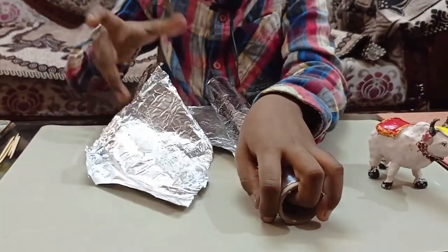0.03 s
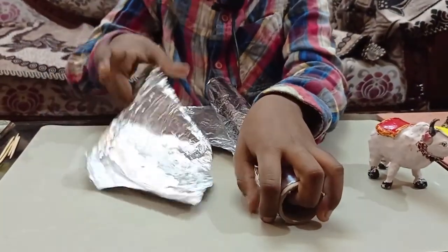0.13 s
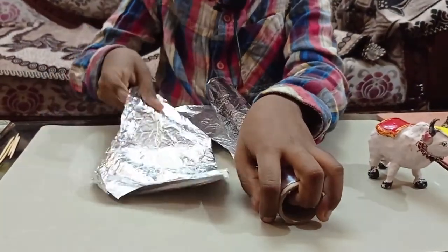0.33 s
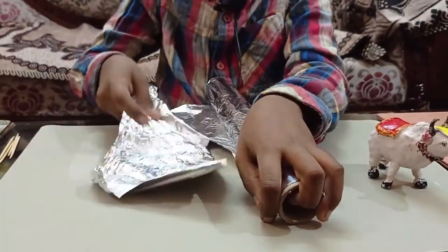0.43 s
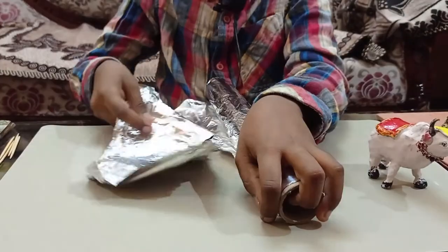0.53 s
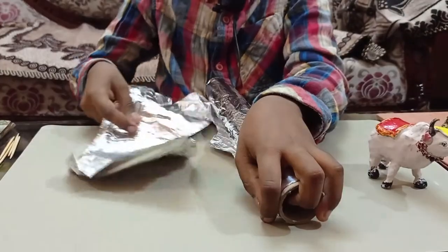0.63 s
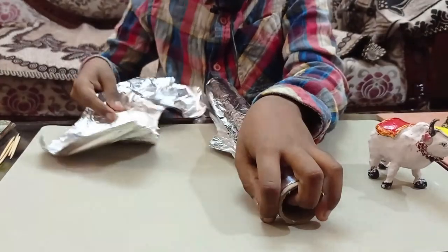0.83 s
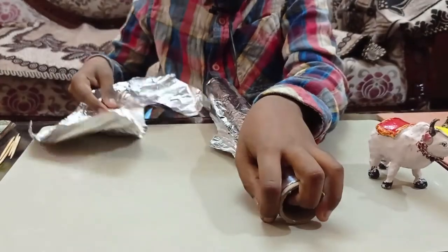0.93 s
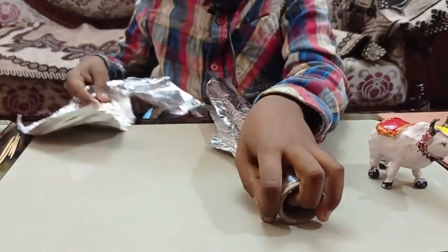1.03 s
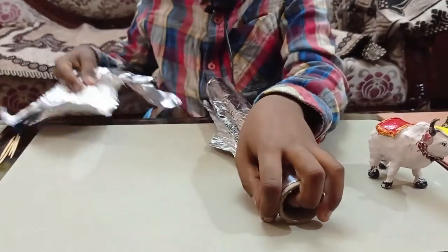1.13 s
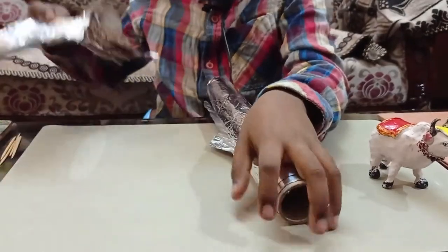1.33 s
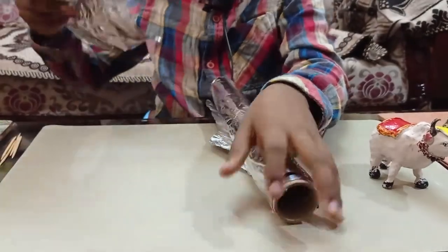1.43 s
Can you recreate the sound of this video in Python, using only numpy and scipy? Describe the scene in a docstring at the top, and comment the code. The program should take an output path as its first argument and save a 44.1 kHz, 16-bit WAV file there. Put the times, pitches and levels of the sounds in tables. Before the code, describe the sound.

Aluminium foil crinkles and crackles as a hand crumples and drags it across a table

```python
"""A hand crumples a sheet of aluminium foil and drags it over a table in a small, furnished room.
First come faint crackles and dull bumps: short, low, quickly damped rings on the table top.
From 0.2 s thousands of tiny creases buckle, each ringing its facets briefly, and larger creases snap.
From about 0.45 to 1.25 s the foil also slides, heard as coloured noise with a rough ring near 0.75 s.
Then the crinkling thins out to a few weak snaps; echoes and a very faint hiss run all the way through."""
import sys
import numpy as np
from scipy import signal
from scipy.fft import rfft, irfft
from scipy.io import wavfile

SR = 44100
rng = np.random.default_rng(int(sys.argv[2]) if len(sys.argv) > 2 else 0)


def store_pcm(level_fs):
    """Save levels as 16-bit WAV."""
    pcm = np.round(np.clip(level_fs, -1, 1) * 32767).astype(np.int16)
    wavfile.write(sys.argv[1], SR, np.atleast_2d(pcm).T)


N = 66150  # length of the scene in samples (1.5 s)
FACET_ATTACK_S = 0.000067  # how quickly a piece of foil starts to sound


def undb(db):
    """Turn decibels into a plain gain."""
    return 10 ** (np.asarray(db) / 20)


def unit(x):
    """Scale a sound so that its average (rms) level is 1."""
    return x / np.sqrt(np.mean(x ** 2))


def band(x, hz, kind="bandpass", order=3):
    """Keep only some of the frequencies (Butterworth filter)."""
    edges = np.clip(hz, 10, .45 * SR)
    return signal.sosfilt(signal.butter(order, edges, kind, fs=SR, output="sos"), x)


def colour(x, points):
    """Shape the tone to follow (frequency [Hz], level [dB]) points, without any sound before its cause."""
    hz, db = np.array(points).T
    size = 2048
    f = np.maximum(np.fft.rfftfreq(size, 1 / SR), 1)
    gain = undb(np.interp(np.log(f), np.log(hz), db))
    # folding the cepstrum forward in time gives a minimum-phase filter
    cepstrum = irfft(np.log(gain))
    cepstrum[1:size // 2] *= 2
    cepstrum[size // 2 + 1:] = 0
    impulse = irfft(np.exp(rfft(cepstrum)))
    return signal.fftconvolve(x, impulse)[:N]


def add(out, s, sound):
    """Mix a sound in at time s."""
    i = int(np.clip(s * SR, 0, N - 1))
    out[i:i + len(sound)] += sound[:N - i]


def ring(t, hz, decay_s):
    """A vibration that dies away, like a tapped plate."""
    return np.sin(2 * np.pi * hz * t) * np.exp(-t / decay_s)


def hiss():
    """Very faint steady noise, softer above 2 kHz."""
    return undb(-101) * unit(band(rng.standard_normal(N), 2000, "lowpass", order=1))


# Tone of the echoes off walls and furniture, only the shape counts: (frequency [Hz], level [dB])
ROOM_TONE = [(60, -8.5), (200, -2), (1300, -0.5), (1750, 1), (2300, 0.5), (3250, -5.5), (4500, 3),
             (5300, -34), (6300, -6), (10500, -6), (15000, -5)]
ROOM_DB, ROOM_T60_S, ROOM_GAP_S = -10.5, 0.23, 0.0035  # T60: time for the echoes to fall by 60 dB


def room(x):
    """Short, soft reflections from walls and furniture, as a fading burst of noise-like echoes."""
    t = np.arange(N) / SR
    fade = np.exp(-np.log(1000) * t / ROOM_T60_S) * (t > ROOM_GAP_S)
    tail = colour(rng.standard_normal(N), ROOM_TONE) * fade
    echoes = tail / np.sqrt(2 * np.sum(tail ** 2))  # the 2 takes a further 3 dB off ROOM_DB
    return undb(ROOM_DB) * signal.fftconvolve(x, echoes)[:N]


# Loudness of the crinkling in four bands, from low to high:
# (time [s], low-mid level [dB], mid level [dB], treble level [dB], top level [dB])
CRINKLE_LEVELS = [(0, -55, -51, -73, -88), (0.018, -69.5, -66.5, -88, -84), (0.07, -80, -69.5, -82, -103),
                  (0.13, -96, -117, -108, -107), (0.178, -100, -102, -110, -109),
                  (0.209, -66, -58.5, -73, -77), (0.23, -47, -47.5, -66, -71), (0.27, -51, -56.5, -62, -70),
                  (0.335, -53.5, -47.5, -65, -58), (0.36, -44.5, -46.5, -59, -68),
                  (0.406, -56.5, -56.5, -68, -65), (0.469, -53.5, -47, -77, -63),
                  (0.488, -48, -44.5, -60.5, -61.5), (0.563, -45, -44, -58.5, -57),
                  (0.598, -36.5, -36, -57, -56), (0.625, -38.5, -32.5, -46.5, -52),
                  (0.7, -39, -34, -54.5, -52), (0.77, -41, -36.5, -51, -59.5), (0.88, -46, -38, -48, -58),
                  (0.967, -47, -40.5, -53, -63), (0.978, -40.5, -36.5, -50, -57.5),
                  (1.069, -48.5, -37.5, -48, -59), (1.095, -55, -47, -62, -65),
                  (1.132, -45, -32.5, -46, -56), (1.167, -69, -70.5, -64, -79),
                  (1.203, -49.5, -41.5, -47, -65), (1.25, -63, -57.5, -64, -89),
                  (1.32, -84.5, -66, -84, -91), (1.39, -77, -63.5, -92, -79), (1.429, -75.5, -64, -80, -80),
                  (1.47, -74, -59, -60, -75), (1.5, -84, -68, -76, -70)]


def level_curve(column):
    """One column of the crinkle level in dB, at every sample."""
    rows = np.array(CRINKLE_LEVELS)
    return np.interp(np.arange(N) / SR, rows[:, 0], rows[:, column])


# Soft bumps of sheet and hand: (time [s], level before BUMP_DB is added [dB], ring frequency [Hz])
SOFT_BUMPS = [(.004, -60, 200), (.035, -71, 70), (.085, -59.5, 68), (0.198, -56, 89.5), (0.227, -42, 162),
              (0.247, -51, 110), (0.262, -47, 116), (.329, -42, 123), (0.395, -45.5, 177), (.426, -35, 216),
              (.489, -40.5, 159), (0.553, -46, 160), (0.577, -53, 110), (0.587, -43, 150), (0.699, -46, 80),
              (0.731, -52, 72.4), (0.761, -53, 109), (0.814, -47, 134), (0.975, -40, 207),
              (1.009, -65, 218), (1.111, -51, 103), (1.12, -44, 138), (1.204, -45, 207), (1.249, -55, 68),
              (1.329, -60.5, 74.5)]
BUMP_DB, BUMP_CYCLES, BUMP_ATTACK_S = 4, 0.72, 0.0014
# flutter: level at the loudest mid-band crinkle, its band, and dB of change per dB of crinkle
FLEX_DB, FLEX_HZ, FLEX_FOLLOW = -57.5, (63, 237), 0.66


def handling():
    """Dull bumps, damped within about a cycle, and the low flutter of the flexing sheet."""
    bumps, t = np.zeros(N), np.arange(SR // 10) / SR
    attack = 1 - np.exp(-t / BUMP_ATTACK_S)
    for s, db, hz in SOFT_BUMPS:
        add(bumps, s, undb(db + BUMP_DB) * ring(t, hz, BUMP_CYCLES / hz) * attack)
    effort_db = level_curve(2)
    flex_db = FLEX_DB + FLEX_FOLLOW * (effort_db - effort_db.max())
    flutter = unit(band(rng.standard_normal(N), FLEX_HZ)) * undb(flex_db)
    return bumps + flutter


SCRAPE_DB, SCRAPE_S, SCRAPE_LENGTH_S = -46, .75, 0.057  # loudest at SCRAPE_S, in a bell-shaped swell
SCRAPE_HZ, SCRAPE_RISE_HZ_PER_S, SCRAPE_WIDTH_HZ = 824, 1440, 54  # pitch at SCRAPE_S, rise, roughness


def scrape():
    """A brief ring as the sheet slides: a rising tone made rough by slow random wobble."""
    t = np.arange(N) / SR - SCRAPE_S
    phase = 2 * np.pi * (SCRAPE_HZ * t + SCRAPE_RISE_HZ_PER_S * t ** 2 / 2)
    grip = band(rng.standard_normal((2, N)), SCRAPE_WIDTH_HZ, "lowpass", order=2)
    rough_tone = unit(grip[0] * np.sin(phase) + grip[1] * np.cos(phase))
    swell = np.exp(-.5 * (t / SCRAPE_LENGTH_S) ** 2)
    return undb(SCRAPE_DB) * rough_tone * swell


# Tone of the sliding friction, only the shape counts: (frequency [Hz], level [dB])
SLIDE_TONE = [(200, -22), (800, -12), (1600, -9.5), (3200, -0.5), (4800, -9), (6900, -18), (8100, -25),
              (10300, -31), (13500, -44), (15200, -31), (16000, -37)]
SLIDE_S, SLIDE_RAMP_S, SLIDE_DB = (0.556, 1.157), 0.25, 1  # mid-ramp times; level beside the creases


def sliding():
    """Fine friction of the foil on the table, too dense to hear as single grains."""
    t = np.arange(N) / SR
    inside_s = np.minimum(t - SLIDE_S[0], SLIDE_S[1] - t)
    contact = np.clip(inside_s / SLIDE_RAMP_S + .5, 0, 1)
    rustle = unit(colour(rng.standard_normal(N), SLIDE_TONE))
    return undb(SLIDE_DB) * contact * rustle, contact


# Larger creases that snap:
# (time [s], facet peak level [dB], ring frequency [Hz], crack level beside it before CRACK_DB is added [dB])
BIG_SNAPS = [(0.0437, -50.5, 6410, 4.5), (0.141, -88, 3450, -8), (0.204, -55, 3600, -14),
             (0.2114, -50, 3650, -20), (0.22, -34, 3300, -15), (0.2244, -31, 3160, -17.5),
             (0.277, -33.5, 3530, -8), (0.292, -31.5, 1080, -27), (0.3059, -24.5, 3130, -11),
             (0.3097, -22.5, 2700, -17), (0.3123, -33, 1400, -20), (0.3239, -30, 2080, -24),
             (0.354, -31, 3320, -17), (0.3649, -25.5, 1016, -39), (0.3754, -27, 3130, -11),
             (0.414, -39, 1230, -20), (0.4325, -25, 3370, -23), (0.4354, -30, 1250, -11),
             (.457, -35.5, 1060, -11), (.482, -33, 3640, -15), (.494, -39, 3550, -6), (.534, -31, 1140, -9),
             (0.5427, -27, 3800, -9.5), (.552, -24, 2700, -17), (0.6174, -23, 1060, -12),
             (.626, -19, 3160, -17), (0.6487, -25.5, 2920, -11), (0.7115, -24, 2870, -16),
             (.806, -21, 3600, -20), (0.957, -30, 3770, -27), (.978, -26, 3360, -15.5),
             (1.063, -26, 1010, -18), (1.2025, -27, 2060, -22), (1.2198, -29.5, 3850, -39),
             (1.271, -36, 3520, -46), (1.3426, -44, 3540, -20), (1.3632, -44, 3970, -33),
             (1.3861, -52, 3500, -16), (1.3965, -44.5, 3700, -31), (1.4573, -36.5, 3820, -9)]
CRACK_DB, CRACK_S, CRACK_HZ = -12, 0.0053, (5660, 10900)  # level, decay and band of the bright crack
SNAP_RING_S, SPLINTER_DB, SPLINTER_S = 0.00062, -14.5, 0.0047  # facet decay; splinter level and decay


def snaps():
    """A large crease flips: its facet rings, small creases follow, and a bright crack tops it."""
    out, t = np.zeros(N), np.arange(SR // 20) / SR
    attack = 1 - np.exp(-t / FACET_ATTACK_S)
    for s, db, hz, crack_db in BIG_SNAPS:
        noise = rng.standard_normal((2, len(t)))
        splinters = unit(band(noise[0], (800, 4500))) * np.exp(-t / SPLINTER_S)
        crack = unit(band(noise[1], CRACK_HZ)) * np.exp(-t / CRACK_S)
        facet = band(ring(t, hz, SNAP_RING_S), (hz / 2, 2 * hz), order=2)
        facet = facet / np.abs(facet).max()
        noisy_part = undb(SPLINTER_DB) * splinters + undb(crack_db + CRACK_DB) * crack
        add(out, s, undb(db) * (facet + attack * noisy_part))
    return out


CREASES_PER_S, CREASE_SPREAD_DB, MODE_SPREAD_DB = 2200, 3, 3.5  # spreads: random loudness differences
FACET_CYCLES, FACET_MAX_S = 4.74, 0.0032  # cycles in one decay time, and the longest decay time
SCATTER_S = .002  # bending waves reach each facet at their own time


def creases():
    """Tiny buckles at random moments; each sets three facets ringing, slightly apart in time."""
    modes, length = 3, 400
    low_hz, high_hz = 200, 16500
    count = int(CREASES_PER_S * N / SR)
    chance = rng.random((count, 1 + 2 * modes, 1))
    size = np.clip(rng.standard_normal((count, 1 + 2 * modes, 1)), -2, 2)
    t, out = np.arange(length) / SR, np.zeros(N)
    attack = 1 - np.exp(-t / FACET_ATTACK_S)
    for k in range(1, modes + 1):
        hz = (np.sqrt(low_hz) + chance[:, k] * (np.sqrt(high_hz) - np.sqrt(low_hz))) ** 2
        decay_s = np.minimum(FACET_CYCLES / hz, FACET_MAX_S)
        loudness = undb(CREASE_SPREAD_DB * size[:, 0] + MODE_SPREAD_DB * size[:, k])
        gain = loudness * np.sign(size[:, modes + k])  # push or pull at random
        balance = np.sqrt(np.sqrt(hz) / decay_s)  # evens out energy over frequency
        grains = gain * balance * ring(t, hz, decay_s) * attack
        start = chance[:, 0] * N + chance[:, modes + k] * SCATTER_S * SR
        where = start.astype(int) + np.arange(length)
        out += np.bincount(where.ravel(), grains.ravel(), N)[:N]
    return out


# Tone of the crinkling, only the shape within each band counts: (frequency [Hz], level [dB])
FOIL_TONE = [(100, -6.5), (220, -6.5), (300, -11.5), (480, -4), (850, -5.5), (1600, -0.5), (2400, -1),
             (3200, 3.5), (3900, 1.5), (4700, -9), (7000, -15), (8000, -26.5), (10300, -29), (13500, -33.5),
             (14900, -31), (15800, -35)]
BAND_EDGES_HZ = (190, 1210, 4370, 7320, 18000)


def crinkle():
    """The swarm of buckles and friction, its four bands swelling and fading as the hand squeezes."""
    friction, contact = sliding()
    buckles = unit(colour(creases(), FOIL_TONE))
    # sliding changes the mixture but not the overall strength
    swarm = (buckles + friction) / np.hypot(1, undb(SLIDE_DB) * contact)
    out = np.zeros(N)
    for k in range(len(BAND_EDGES_HZ) - 1):
        part = unit(band(swarm, BAND_EDGES_HZ[k:k + 2], order=5))
        out += part * undb(level_curve(k + 1))
    return out


def scene():
    """Foil and hand in the room, over a faint hiss."""
    direct = crinkle() + snaps() + scrape() + handling()
    return (direct + room(direct) + hiss())[None]


def record(dry):
    """Thin the deep bass below 52 Hz and cut the top steeply above 15.9 kHz."""
    thin = band(dry, 52, "highpass", order=2)
    return signal.sosfilt(signal.ellip(10, .2, 70, 15900, fs=SR, output="sos"), thin)


dry = scene()
out = record(dry)
store_pcm(out)
```